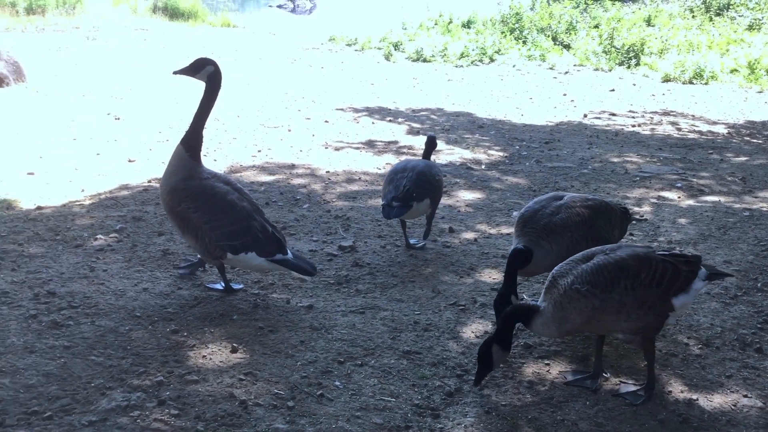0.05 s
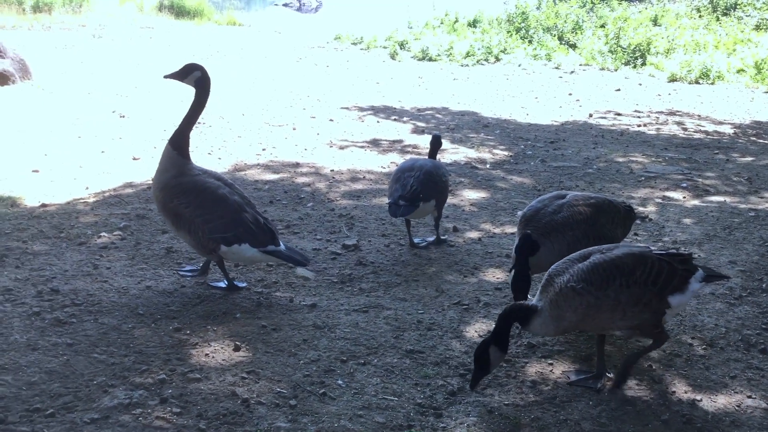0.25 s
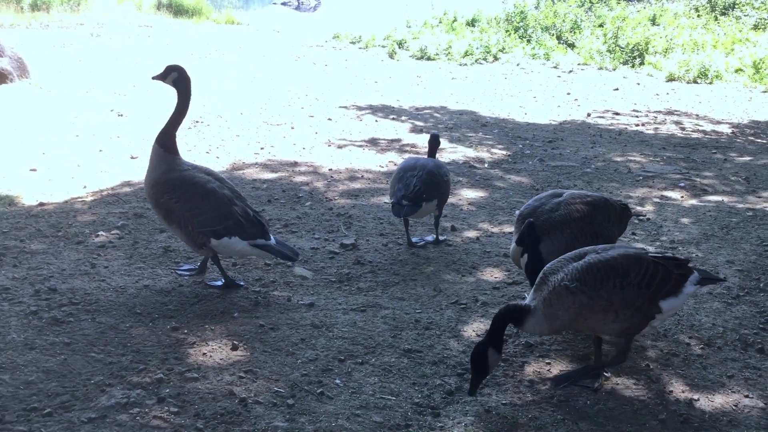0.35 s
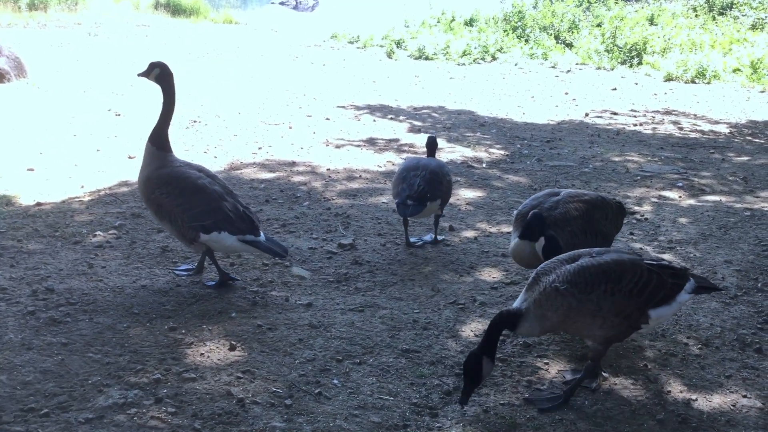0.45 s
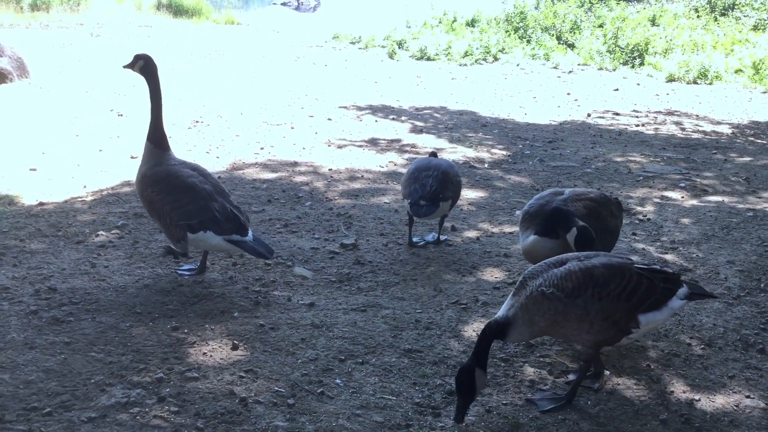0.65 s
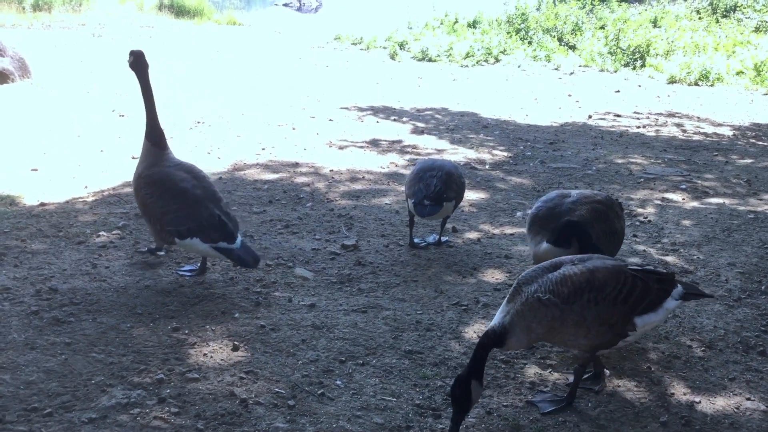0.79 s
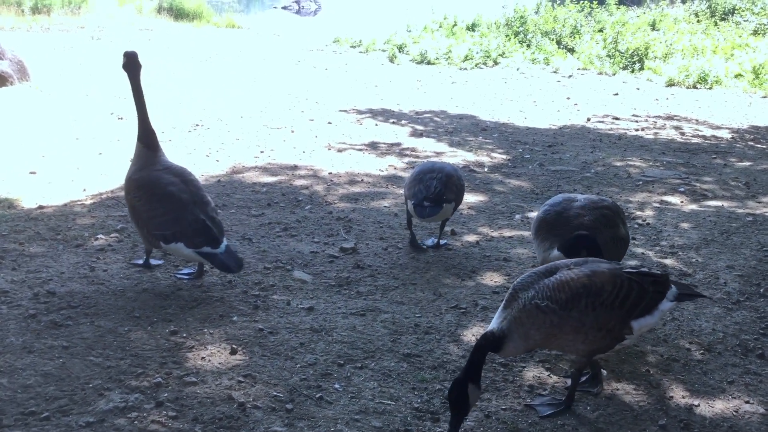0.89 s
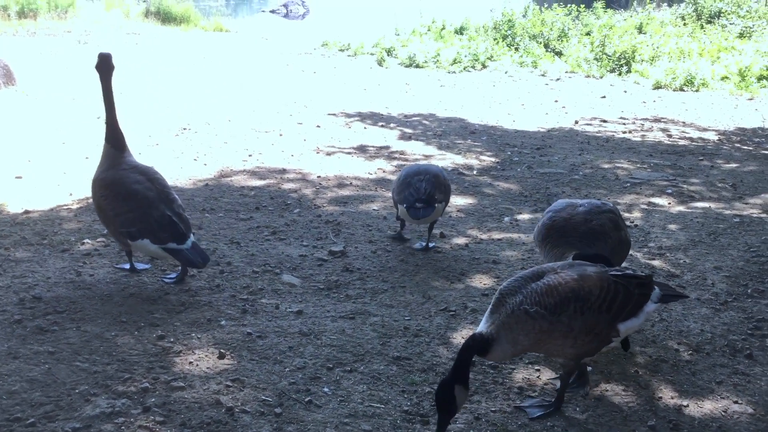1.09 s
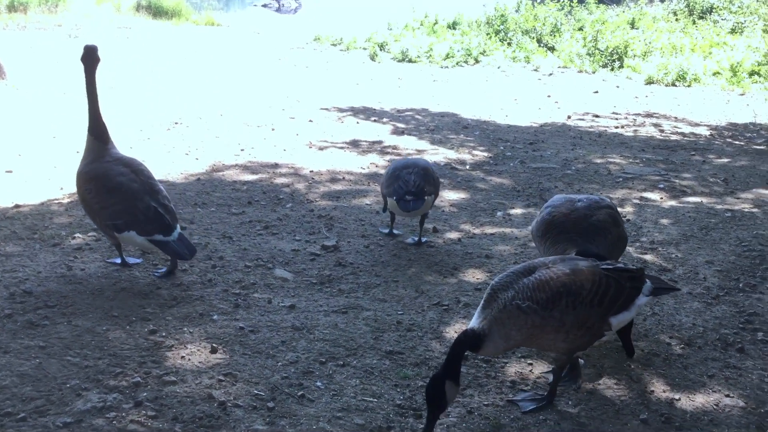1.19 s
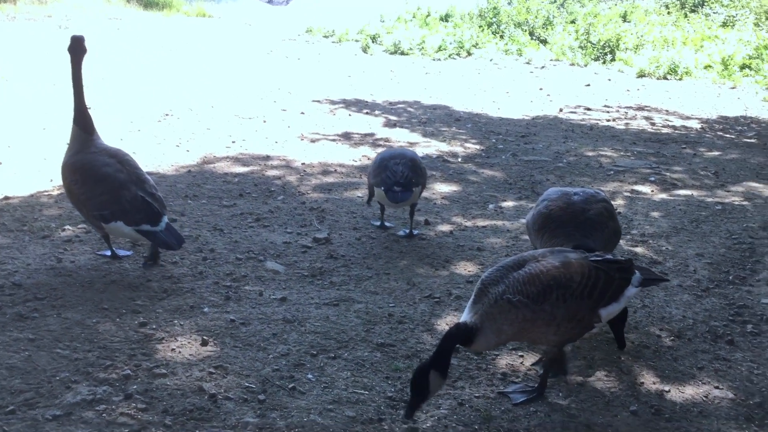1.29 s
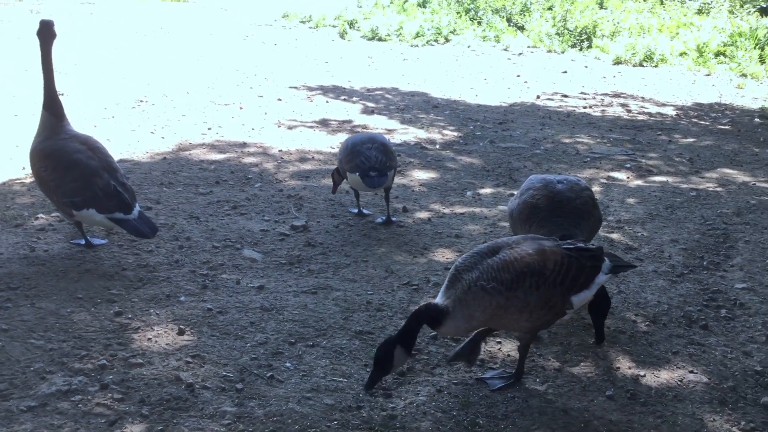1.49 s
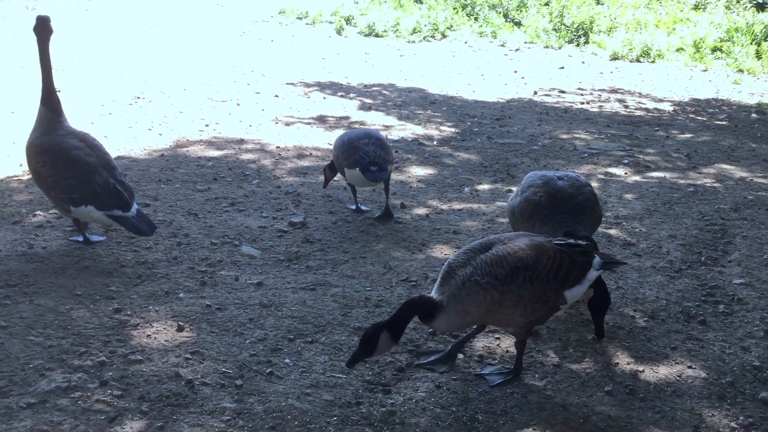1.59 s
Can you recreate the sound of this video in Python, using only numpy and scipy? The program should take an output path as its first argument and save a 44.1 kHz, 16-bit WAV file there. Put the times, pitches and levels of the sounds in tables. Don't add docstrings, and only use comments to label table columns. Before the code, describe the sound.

Three brief goose calls come close together early on, then only faint scuffs, tiny snaps and soft footfalls on a dry bank; open outdoor air, a slight echo, microphone a few metres away.

```python
import sys
import numpy as np
from scipy import signal
from scipy.fft import rfft, irfft, next_fast_len
from scipy.io import wavfile
from scipy.ndimage import uniform_filter1d, map_coordinates

SR = 44100
rng = np.random.default_rng(int(sys.argv[2]) if len(sys.argv) > 2 else 0)


def ratio(d):
    e = np.asarray(d, float) / 20
    return 10 ** e


def pcm_store(signal):
    levels = np.round(np.clip(np.atleast_2d(signal), -1, 1) * 32767)
    wavfile.write(sys.argv[1], SR, levels.astype(np.int16).T)


N = 72765

# (frequency [Hz], level per Hz [dB])
RUMBLE_COLOUR = [(25, -42.5), (45, -20), (81, -11), (162, -2), (241, -6), (320, -19), (500, -34.5),
                 (900, -52.5)]
# (frequency [Hz], level per Hz [dB])
WATER_COLOUR = [(200, -14), (300, -2), (473, -5), (1000, -0.5), (1400, -3), (1940, -10.5), (8910, -26),
                (13500, -32)]
# (time [s], peak level [dB], centre frequency [Hz])
SNAP_EVENTS = [(0.074, -56.5, 4500), (.1615, -58.5, 12000), (.1617, -57, 6000), (.2, -62, 7000),
               (0.354, -58, 3840), (.395, -56.5, 6500), (0.4776, -52.5, 6770), (.609, -54.5, 4820),
               (.734, -61, 5040), (.879, -59, 4970), (.925, -49.5, 2010), (.927, -56.5, 7400),
               (1.007, -63, 8000), (1.08, -62, 8000), (1.117, -60, 5000), (1.146, -57, 4270),
               (1.216, -54.5, 3820), (1.255, -60, 4500), (1.279, -63, 7000), (1.3, -63, 4000),
               (1.34, -61.5, 5500), (1.369, -66, 3800), (1.489, -62, 7100), (1.52, -62, 6000)]
# (time [s], peak level [dB], ringing frequency [Hz], time to fall 60 dB [s])
RUSTLE_EVENTS = [(0.083, -62.5, 8480, 0.084), (.1, -55, 4800, 0.028), (.125, -69, 3550, 0.031),
                 (.163, -54, 4760, 0.097), (.195, -56.5, 5100, 0.072), (.227, -59, 5900, 0.054),
                 (0.257, -57.5, 4600, 0.15), (.31, -55, 6200, .03), (.363, -57, 4800, 0.091),
                 (0.3778, -59, 4430, .06), (.474, -64.5, 2030, .04), (.568, -57.5, 3700, 0.068),
                 (.8784, -56, 4500, 0.026), (.9228, -43.5, 2640, 0.033), (0.9257, -57, 5100, 0.084),
                 (0.925, -44.5, 3400, 0.022), (1.004, -52, 5570, 0.043), (1.05, -65.5, 5750, 0.23),
                 (1.275, -60.5, 2850, 0.039), (1.48, -64, 4140, 0.11), (1.544, -59.5, 9300, 0.029)]
# (frequency [Hz], level [dB])
GRIT_COLOUR = [(1200, -37), (2500, 5), (5000, -7.5), (9000, -14), (14000, -24)]
# (time [s], peak level [dB], frequency [Hz])
FOOTFALLS = [
    (0.164, -44.5, 154.5),
    (0.239, -48, 118),
    (0.39, -65, 120),
    (.542, -47.5, 105),
    (.665, -49.5, 180),
    (0.825, -54, 179),
    (0.949, -49, 110),
    (1.046, -56, 117),
    (1.151, -52, 170),
    (1.476, -56, 100),
]
# (time [s], pitch [Hz], effort [dB])
CALL_GLIDES = [
    [(0.2338, 823, -40.7), (0.2372, 929, -37.9), (0.2453, 991, -31.4), (0.2615, 1128, -46.2),
     (0.2835, 1015, -29.9), (0.3055, 1018, -33.9), (0.3158, 916, -23.7), (0.3218, 897, -22.9),
     (0.3326, 854, -31.4)],
    [(0.3974, 1135, -59.0), (0.4079, 1173, -51.3), (0.417, 1407, -39.2), (0.4344, 1484, -37.9),
     (0.445, 1367, -34.3), (0.4506, 1243, -41.5), (0.4665, 1165, -43.5), (0.4766, 1065, -50.0),
     (0.4878, 835, -39.3)],
    [(.5295, 900, -39.5), (.5366, 998, -29.2), (.5498, 1153, -42.9), (.5555, 1256, -30.7),
     (.572, 1750, -38), (.589, 1900, -39), (.6045, 1610, -31), (.6117, 1334, -22), (.6444, 894, -41)],
]
# (second partial level [dB], third partial level [dB], rasp level [dB])
CALL_OVERTONES = [
    (-68, -69, -70),
    (-70, -73, -67),
    (-69, -82, -61),
]
# (frequency [Hz], level [dB])
WINDPIPE_COLOUR = [(800, -14.9), (911, -14.3), (982, 1.7), (1063, 2.5), (1170, 5.6), (1202, 3.3),
                   (1322, -3.8), (1542, -26.8)]
# (frequency [Hz], level [dB])
BILL_COLOUR = [(1500, -12), (2000, 0), (2850, -2), (3050, -8), (3400, 4), (3750, -8), (4400, -15),
               (9000, -32)]
# (frequency [Hz], time to fall 60 dB [s])
ECHO_DECAY = [(500, 0.19), (1200, 0.083), (5000, 0.061)]


def unit(x):
    return x / np.sqrt(np.mean(x ** 2) + 1e-20)


def along(points, hz):
    f, v = np.transpose(points)
    return np.interp(np.log(hz + 1), np.log(f + 1), v)


def wobble(rate):
    knots = rng.standard_normal(int(N * rate / SR) + 4)
    return map_coordinates(knots, [np.arange(N) * rate / SR])


def coloured(x, points):
    m = 2 * next_fast_len(N // 2 + SR // 4)
    gain = ratio(along(points, np.fft.rfftfreq(m, 1 / SR)))
    cepstrum = irfft(np.log(gain + 1e-6), m)
    cepstrum[1:m // 2] *= 2
    cepstrum[m // 2 + 1:] = 0
    return irfft(rfft(x, m) * np.exp(rfft(cepstrum)), m)[:len(x)]


def rush(colour, patchy_db):
    z = signal.stft(rng.standard_normal(N), nperseg=512)[2]
    patches = uniform_filter1d(rng.standard_normal(z.shape), size=8, axis=0)
    patches = uniform_filter1d(patches, size=6, axis=1)
    noise = signal.istft(z * ratio(patchy_db * unit(patches)), nperseg=512)[1][:N]
    return unit(coloured(noise, colour))


def background():
    rumble_db, water_db = -63, -66
    whine_hz, whine_db = 8991, -100
    rumble_gain = ratio(rumble_db + 0.4 * wobble(3.5) + 1.3 * wobble(19))
    rumble = rumble_gain * rush(RUMBLE_COLOUR, patchy_db=-0.5)
    water_gain = ratio(water_db + 0.3 * wobble(2.5) + 0.5 * wobble(12))
    water = water_gain * rush(WATER_COLOUR, patchy_db=0.8)
    whine = ratio(whine_db) * np.sqrt(2) * np.sin(2 * np.pi * whine_hz * np.arange(N) / SR)
    return rumble + water + whine


def grains(count=260):
    level_db, spread_db, centre_hz = -80.5, 4, 4500
    draw = rng.random((count, 2))
    size = rng.standard_normal(count)
    t = np.arange(160) / SR
    hz = (centre_hz * np.exp(0.13 * size))[:, None]
    strength = ratio(level_db - spread_db * np.log(draw[:, 1:] + 1e-9))
    tick = strength * np.sin(2 * np.pi * hz * t) * np.exp(-hz * t / 0.83)
    where = (draw[:, :1] * N).astype(int) + np.arange(len(t))
    return np.bincount(where.ravel(), tick.ravel(), N + len(t))[:N]


def snaps():
    fall_s, width, level_db = 0.02, 0.28, -9.5
    out, t = np.zeros(N + SR), np.arange(SR // 20) / SR
    hz_axis = np.fft.rfftfreq(len(t), 1 / SR)
    for s, db, hz in SNAP_EVENTS:
        colour = np.exp(-(np.log((hz_axis + 1) / hz) / width) ** 2 / 2)
        burst = unit(irfft(rfft(rng.standard_normal(len(t))) * colour, len(t)))
        out[round(s * SR):][:len(t)] += ratio(db + level_db - 60 * t / fall_s) * burst
    return out[:N]


def rustles():
    ring_width, rise_s = 0.06, 0.0018
    level_db, spray_db, crackle_db = -10, -2, 3.5
    out, t = np.zeros(N + SR), np.arange(SR // 5) / SR
    hz_axis = np.fft.rfftfreq(len(t), 1 / SR)
    for s, db, hz, fall_s in RUSTLE_EVENTS:
        noise = rfft(rng.standard_normal(len(t)))
        ring = unit(irfft(noise / (1 + ((hz_axis / hz - 1) / ring_width) ** 2), len(t)))
        spray = unit(irfft(noise * ratio(along(GRIT_COLOUR, hz_axis)), len(t)))
        crackle = ratio(crackle_db * map_coordinates(rng.standard_normal(len(t)), [t * 350]))
        shape = ratio(db + level_db - 60 * t / fall_s) * (1 - np.exp(-t / rise_s))
        out[round(s * SR):][:len(t)] += shape * crackle * (ring + ratio(spray_db) * spray)
    return out[:N]


def steps():
    fall_s, rise_s = 0.074, 0.0024
    t, out = np.arange(N) / SR, np.zeros(N)
    for s, db, hz in FOOTFALLS:
        since = np.clip(t - s, 0, None)
        shape = ratio(db - 60 * since / fall_s) * (1 - np.exp(-since / rise_s))
        out += shape * np.sin(2 * np.pi * hz * since)
    return out


def grunt(first_phase):
    start_s, long_s, pitch_hz = 0.229, 0.05, 210
    low_db, beat_db = -55, -50
    t = np.arange(N) / SR
    low = 2 * np.pi * pitch_hz * np.cumsum(1 + 0.051 * wobble(130)) / SR
    swell = np.sin(np.pi * np.clip((t - start_s) / long_s, 0, 1)) * ratio(3 * wobble(100))
    return swell * (ratio(low_db) * np.sin(low) + ratio(beat_db) * np.sin(first_phase - low))


def goose():
    attack_s, release_s = 0.004, 0.004
    flutter_db, jitter, breath_db = 0.3, 0.002, -14
    break_hz, break_db, break_jitter = 1480, 4, 0.02
    broken_db, follows = 3.5, 0.12
    t, voice, upper, phases = np.arange(N) / SR, np.zeros(N), np.zeros(N), []
    for rows, (second_db, third_db, rasp_db) in zip(CALL_GLIDES, CALL_OVERTONES):
        s, hz, db = np.transpose(rows)
        pitch = np.interp(t, s, hz)
        strain = np.clip((pitch - break_hz) / 150, 0, 1)
        shaky_pitch = pitch * (1 + (jitter + break_jitter * strain) * wobble(220))
        phase = 2 * np.pi * np.cumsum(shaky_pitch) / SR
        phases.append(phase)
        edges = np.minimum((t - s[0]) / attack_s, (s[-1] - t) / release_s)
        gate = np.sqrt(2) * np.clip(edges + 1, 0, 1) ** 2
        effort_db = np.interp(t, s, db)
        air = rng.standard_normal(N)
        tone = ratio((flutter_db + break_db * strain) * wobble(150)) * np.sin(phase)
        breath = ratio(breath_db) * uniform_filter1d(air, size=14)
        voice += gate * ratio(effort_db) * (tone + breath)
        second = ratio(second_db + broken_db * wobble(70)) * np.sin(2 * phase)
        third = ratio(third_db + broken_db * wobble(70)) * np.sin(3 * phase)
        rasp = ratio(rasp_db + 2.1 * wobble(121.2)) * air
        upper += gate * ratio(follows * (effort_db - db.mean())) * (second + third + rasp)
    return coloured(voice, WINDPIPE_COLOUR) + coloured(upper, BILL_COLOUR) + grunt(phases[0])


def bank_echo(x):
    level_db, delay_s = -27, 0.012
    hz, t, z = signal.stft(rng.standard_normal(SR // 4), SR, nperseg=256)
    fading = z * ratio(-60 * t / along(ECHO_DECAY, hz)[:, None])
    tail = signal.istft(fading, SR, nperseg=256)[1]
    late = np.pad(x, (round(delay_s * SR), 0))
    return ratio(level_db) * signal.fftconvolve(late, tail / np.linalg.norm(tail))[:N]


def scene():
    calls = goose()
    calls_and_echo = calls + bank_echo(calls)
    ground = rustles() + snaps() + grains() + steps()
    return (calls_and_echo + ground + background())[None]


def band_limit(x):
    return signal.sosfilt(signal.butter(12, 14950, fs=SR, output="sos"), x)


def record(dry):
    low_cut_hz, top_hz = 62, 14100
    hz = np.fft.rfftfreq(N, 1 / SR)
    low_cut = hz ** 2 / (hz ** 2 + low_cut_hz ** 2)
    treble_cut = 1 / np.sqrt(1 + (hz / top_hz) ** 80)
    mix = irfft(rfft(dry) * low_cut * treble_cut, N)
    return band_limit(mix)


dry = scene()
out = record(dry)
pcm_store(out)
```